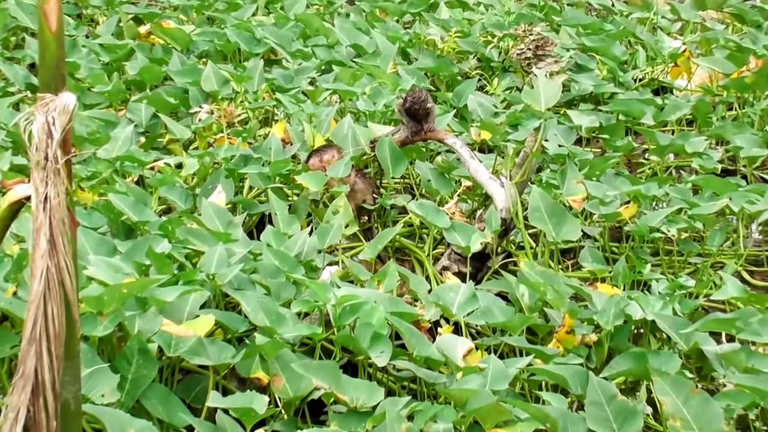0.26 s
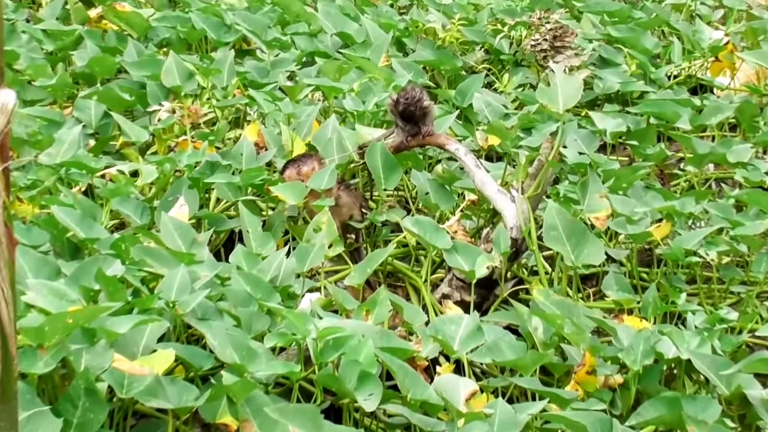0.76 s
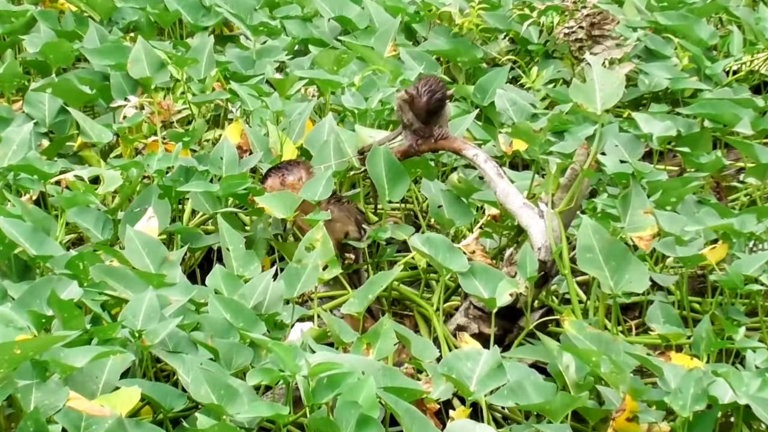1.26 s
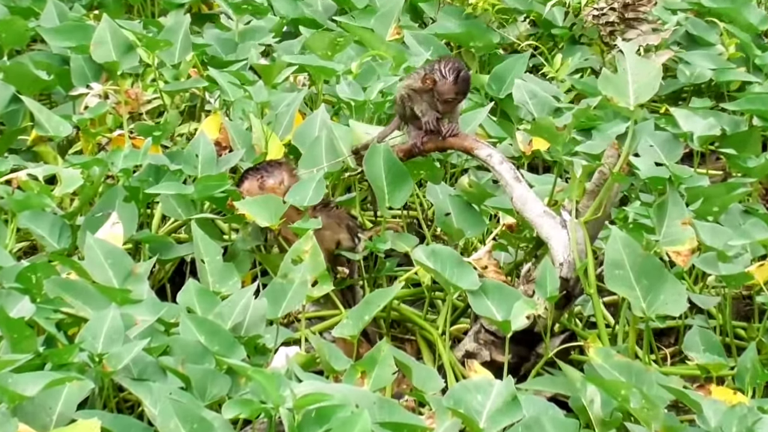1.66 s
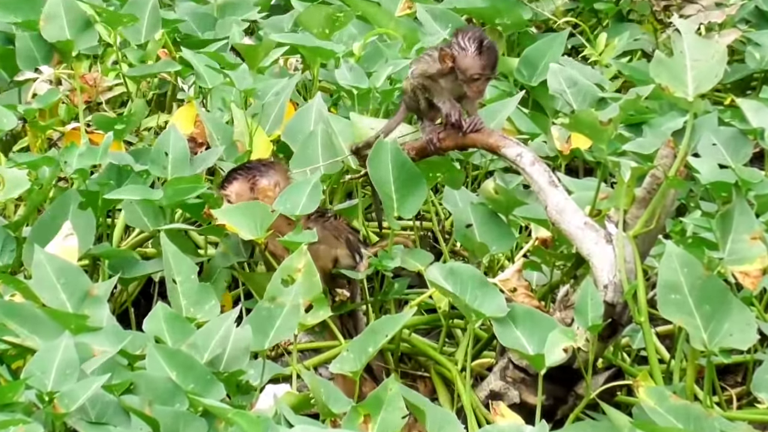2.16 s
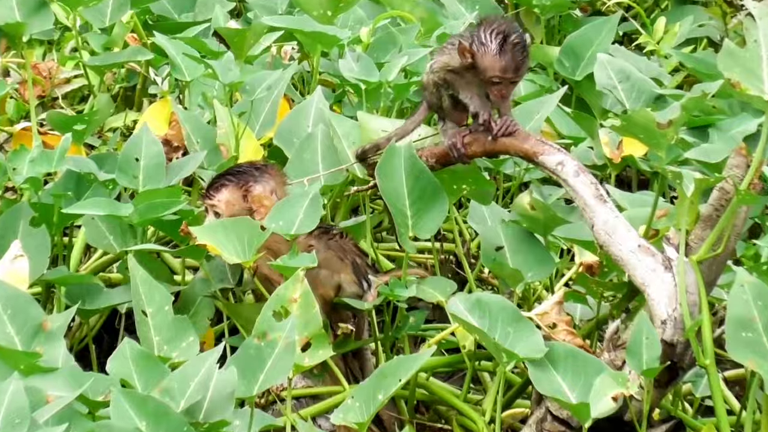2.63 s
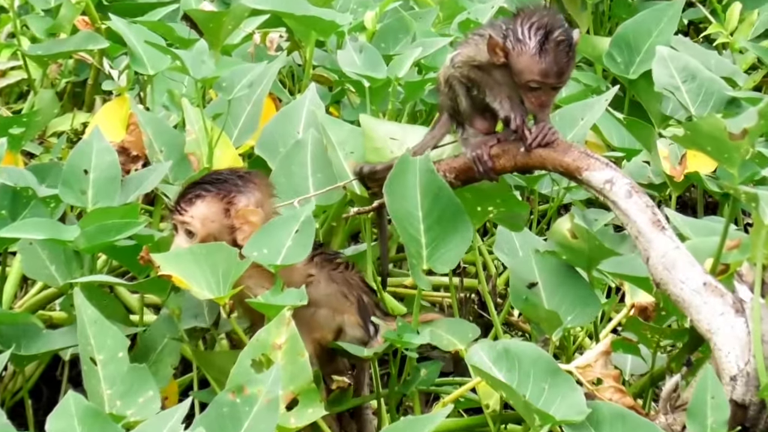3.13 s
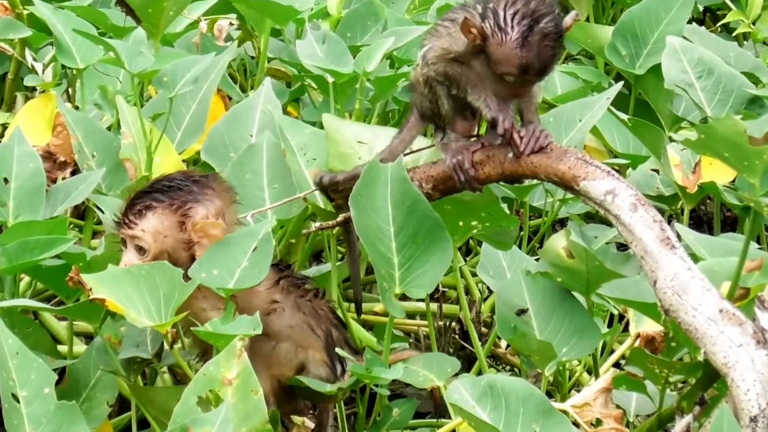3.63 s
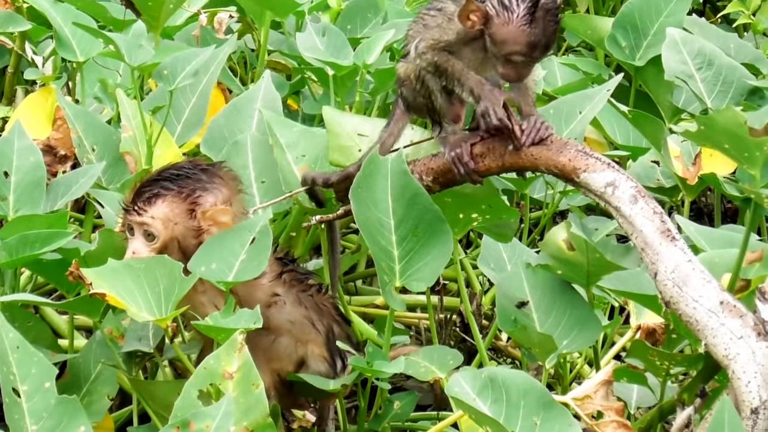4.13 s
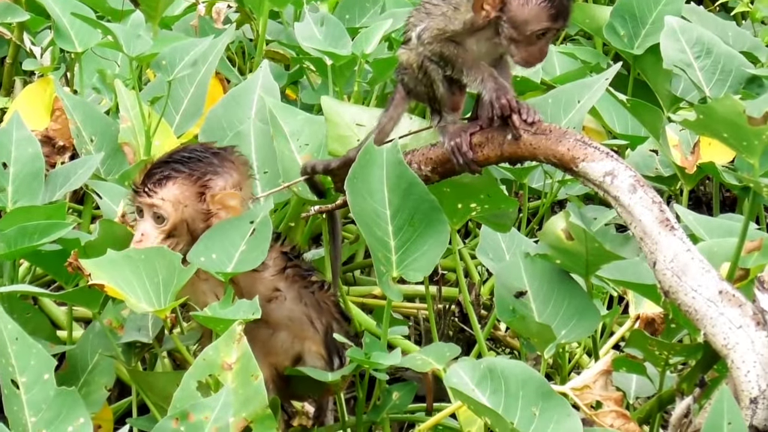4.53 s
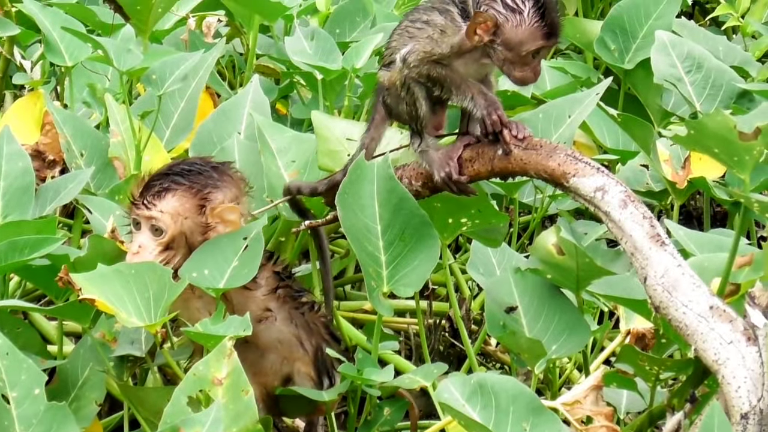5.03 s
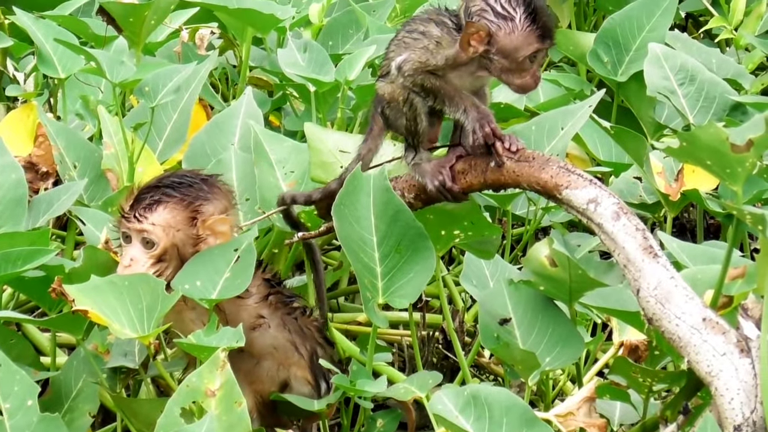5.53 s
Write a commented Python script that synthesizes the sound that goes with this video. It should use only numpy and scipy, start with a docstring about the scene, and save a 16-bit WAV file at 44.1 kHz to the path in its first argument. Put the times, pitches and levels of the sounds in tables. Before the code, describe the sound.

Overlapping monkey coos and hoots in a leafy field, a stalk snap, then two shrill whistling screams that break into harsh rasps.

```python
"""Young monkeys in a field of broad leaves coo to each other, their calls overlapping; then one screams twice.
Calls are harmonics weighted by throat and mouth. Each scream arches up to a whistle and breaks into a rough fall.
Stalks snap as damped rings with noise cracks. Three insects pulse in the treble as narrow resonances, over
a far chorus, a low noise rumble of wind and a faint hush of air."""
import sys
import numpy as np
from scipy import signal
from scipy.fft import rfft, irfft, next_fast_len
from scipy.io import wavfile
from scipy.ndimage import map_coordinates

SR = 44100
rng = np.random.default_rng(int(sys.argv[2]) if len(sys.argv) > 2 else 0)


def transcribe(u):
    """Save the signal u as a 16-bit wav file named by the first command-line argument.

    u: samples, shape (n,) or (channels, n), limited to [-1, 1]; the rate is SR.
    q: integer samples, one column per channel.
    """
    v = np.clip(np.atleast_2d(u).T, -1, 1)
    q = np.round(v * 32767).astype(np.int16)
    wavfile.write(sys.argv[1], SR, q)


N = 254898
TIME = np.arange(N) / SR  # s

# resonances of the throat and wide mouth: [f/Hz, gain/dB]
OPEN_MOUTH = [(500, 36), (900, -5), (1300, 1), (1800, 3), (2200, -20), (2750, -20), (3550, -10),
              (4100, -26), (4600, -31), (5600, -45), (8000, -50), (11000, -49)]
# resonances of the throat and rounded lips: [f/Hz, gain/dB]
PURSED_LIPS = [(550, 9), (900, 2.5), (1250, -3), (1700, -3.5), (2250, -30.5), (2600, -28), (3100, -23),
               (3750, -21.5), (5000, -39.5), (6300, -35), (7700, -41), (10300, -18.5), (12000, -52.5)]
COO_JITTER = 0.004  # random pitch unsteadiness of a clear call, share of the pitch


def amp(db):
    """Decibels to gain."""
    return 10 ** (np.asarray(db) / 20)


def unit(x):
    """Scale to rms 1."""
    return x / np.sqrt(np.mean(x ** 2) + 1e-20)


def along(points, hz):
    """Read (Hz, value) points on a log frequency axis."""
    f, v = np.transpose(points)
    return np.interp(np.log(hz + 1), np.log(f), v)


def curves(rows, t=TIME):
    """Read every column after the first at the points t of the first."""
    s, *cols = np.transpose(rows)
    return [np.interp(t, s, c) for c in cols]


def wobble(rate, t=TIME):
    """A smooth random curve, rate knots a second."""
    at = (t - t[0]) * rate
    return map_coordinates(rng.standard_normal(int(at[-1]) + 4), [at])


def filtered(x, response):
    """Multiply the spectrum of x by a response of frequency."""
    m = next_fast_len(N + SR // 4)
    hz = np.fft.rfftfreq(m, 1 / SR)
    return irfft(rfft(x, m) * response(hz), m)[..., :N]


def panned(x, left_db):
    """Louder on the left by left_db, at the same power."""
    return x * unit(amp([[left_db / 2], [-left_db / 2]]))


def rush(spectrum, alike):
    """Stereo noise of rms 1 with a colour and a left-right likeness, mixed from mid and side."""
    def mid_side(hz):
        turn = np.arccos(np.clip(along(alike, hz), -1, 1)) / 2
        return amp(along(spectrum, hz)) * [np.cos(turn), np.sin(turn)]

    mid, side = filtered(rng.standard_normal((2, N)), mid_side)
    return unit(np.array([mid + side, mid - side]))


def wind():
    """A dull noise rumble with one mild gust and brief dips, and the faint hush of air over the leaves."""
    # brief dips of the rumble: [t/s, depth/dB]
    dips = [(4.38, 5), (4.85, 1.5), (5.27, 8)]
    # colour of the rumble: [f/Hz, relative level/dB]
    rumble_colour = [(12, -53), (20, -62), (34, -13), (64, -2.5), (134, -1), (243, -5.5), (278, -13.5),
                     (313, -18.5), (353, -27), (392, -31), (422, -38.5), (475, -37), (700, -37.5),
                     (910, -56.5), (1540, -120)]
    # colour of the hush: [f/Hz, relative level/dB]
    hush_colour = [(300, 5), (600, 4), (1100, -6.5), (1700, -6.5), (2600, -13.5), (3500, -13),
                   (4400, -17.5), (5600, -21.5), (7000, -17), (11000, -14.5), (15500, -18.5)]
    # left-right likeness of the hush: [f/Hz, likeness/0-1]
    hush_alike = [(600, 0.13), (1400, 0.8), (3100, 1), (5000, 1), (7000, 1), (15000, .05)]
    base_db, gust_peak_db = -33, 1.05
    gust_s, gust_width_s = 1.6, 0.86
    dip_fall_s, dip_return_s = 0.07, 0.41

    gust_db = gust_peak_db * np.exp(-((TIME - gust_s) / gust_width_s) ** 2)
    dip_db = sum(np.interp(TIME, [s - dip_fall_s, s, s + dip_return_s], [0, db, 0]) for s, db in dips)
    rumble_db = base_db + gust_db - dip_db + 0.7 * wobble(15)
    rumble = amp(rumble_db) * rush(rumble_colour, [(100, 0.9), (280, 0.92), (600, 0.13)])
    hush = amp(-57.5 + 0.67 * wobble(2.9)) * rush(hush_colour, hush_alike)
    return panned(rumble, left_db=-3.0) + hush


def song_level(bouts, rest_db):
    """Each bout swells from the resting level, holds and breaks off; in dB."""
    stop_s = 0.05
    levels = [np.interp(TIME, [s, s + swell, end, end + stop_s], [rest_db, db, db, rest_db])
              for s, swell, end, db in bouts]
    return np.max(levels, axis=0)


def insect(song, db, left_db):
    """Even wing strokes with short pauses drive a narrow resonance of the wing, whose phase wanders."""
    hz, width_hz, rate, start, depth, tooth_rate, tooth_depth = song

    def resonance(f, width):
        return np.exp(-((f - hz) / width) ** 2)

    ring = filtered(rng.standard_normal((2, N)), lambda f: resonance(f, width_hz))
    steady = np.cos(np.angle(signal.hilbert(ring)))  # keep the wandering phase, flatten the level
    wing = filtered(steady, lambda f: resonance(f, 2 * width_hz))
    strokes = 1 - depth + depth * np.abs(np.cos(np.pi * rate * (TIME - start)))
    teeth = 1 + tooth_depth * np.cos(2 * np.pi * tooth_rate * TIME)  # the scraper skips over the file
    return panned(amp(db) * unit(wing * strokes * teeth), left_db)


def insects():
    """A katydid that drops away and slowly returns, two crickets, and a far chorus of coloured noise."""
    # songs: [f/Hz, width/Hz, pulse rate/Hz, first pulse/s, depth/0-1, tooth rate/Hz, tooth depth/0-1]
    katydid_song = (9170, 620, 8.13, .103, .88, 165, .45)
    high_song = (7990, 150, 11.65, .054, .7, 0, 0)
    low_song = (4910, 110, 18.25, .021, .92, 0, 0)
    # bouts of song: [t/s, swell/s, end/s, level/dB]
    katydid_bouts = [(-.1, .05, 1.36, -55.5), (4.2, .7, 5.8, -59.5)]
    low_bouts = [(-.1, .05, 0.58, -73.5), (1.3, 0.15, 3.3, -74.5), (3.85, 0.27, 4.72, -76),
                 (5.2, .2, 5.4, -75)]
    chorus_bouts = [(1.8, 1, 5.8, -62.5)]
    # colour of the chorus: [f/Hz, relative level/dB]
    chorus_colour = [(6000, -67), (7400, 9), (8300, 4), (9200, 14.5), (9650, 13.5), (10300, -3.5),
                     (11200, -3.5), (12500, -32)]

    katydid = insect(katydid_song, song_level(katydid_bouts, rest_db=-76.5), left_db=0.5)
    high = insect(high_song, db=-68.5, left_db=0.5)
    low = insect(low_song, song_level(low_bouts, rest_db=-100), left_db=-1)
    chorus_db = song_level(chorus_bouts, rest_db=-66) + wobble(11)
    chorus = amp(chorus_db) * rush(chorus_colour, [(9000, 0.39)])
    return katydid + high + low + chorus


def snaps():
    """Stalks give way, each with a noise crack and a short hollow ring of damped modes."""
    # stalks that break: [t/s, strength/dB]
    breaks = [(0.073, -49), (0.352, -43), (3.651, -30.5)]
    # modes of a hollow stalk: [f/Hz, relative level/dB, t60/s]
    stalk_modes = [(802, 2, 0.04), (1365, -11.5, 0.052), (1840, -1, 0.018), (2560, -6, 0.022),
                   (3280, -5, 0.023), (6350, -16, 0.0045)]
    # colour of the crack: [f/Hz, relative level/dB]
    crack_colour = [(400, -33), (900, -18), (3300, 4), (5000, -2.5), (7300, 2), (10000, -1), (14000, -29)]

    rings, cracks = np.zeros(N + SR), np.zeros(N + SR)
    t = np.arange(SR // 8) / SR
    for s, db in breaks:
        ring = sum(amp(level - 60 * t / t60) * np.sin(2 * np.pi * hz * t + rng.uniform(0, 2 * np.pi))
                   for hz, level, t60 in stalk_modes)
        strength = amp(db) * (1 - np.exp(-t / 0.00036))  # a very short onset
        first = round(s * SR)
        rings[first:][:len(t)] += amp(-3.5) * strength * ring
        cracks[first:][:len(t)] += strength * amp(-60 * t / 0.016) * rng.standard_normal(len(t))
    coloured = filtered(cracks[:N], lambda hz: amp(along(crack_colour, hz)))
    return panned(rings[:N] + coloured, left_db=1.0)


def voice(rows, mouth, bright_db, jitter, rasp=0., count=10):
    """Harmonics of the vocal folds, weighted by the mouth; rough folds scatter in phase and add side tones."""
    on = (TIME >= rows[0][0]) & (TIME <= rows[-1][0])
    t = TIME[on]
    pitch, db, *rough = curves(rows, t)
    chaos = rasp * rough[0] if rough else 0
    pitch = pitch * (1 + jitter * wobble(170.9, t))
    phase = 2 * np.pi * np.cumsum(pitch) / SR + chaos * wobble(1100, t)

    k = np.arange(1, count + 1)[:, None]  # harmonic numbers
    weight_db = along(mouth, k * pitch) - along(mouth, pitch) + bright_db * np.log2(k)
    weights = amp(weight_db) * (k * pitch < SR / 2)
    shimmer = amp(1.2 * np.sqrt(k - 0.8) * np.array([wobble(35, t) for _ in k]))
    harmonics = (weights * shimmer * np.sin(k * phase)).sum(0)
    # strained folds repeat only every fourth cycle, which adds a tone a quarter below the pitch
    side_tone = 0.7 * chaos * np.sin(phase * 3 / 4)

    flutter = amp(0.27 * wobble(64.5, t) + 7.5 * chaos * wobble(760, t))
    edges = np.clip(np.minimum(t - t[0], t[-1] - t) / 0.0039, 0, 1)
    out = np.zeros(N)
    out[on] = np.sqrt(2) * amp(db) * edges * flutter * (harmonics + side_tone)
    return out


def chirps():
    """Brief hoots through pursed lips that swell and slide to their final pitch."""
    # chirps: [t/s, length/s, start f/Hz, end f/Hz, reference level/dB, brightness/dB per octave]
    chirp_rows = [(0.232, .12, 1405, 1750, -71, -9), (.56, 0.1, 1320, 1580, -69.5, 0),
                  (1.162, 0.036, 1210, 1327, -41, -1), (1.262, .073, 556, 550, -55.5, -19),
                  (1.311, 0.034, 783, 1115, -48, 4.5), (2.88, 0.062, 1155, 1198, -42, -4.5),
                  (2.988, 0.058, 1257, 1306, -37.5, -6.5), (3.014, 0.039, 854, 1030, -53.5, 8.5),
                  (4.063, 0.027, 1400, 1630, -55, -4), (4.202, .066, 1550, 3070, -55.5, -16),
                  (4.218, 0.01, 4420, 4830, -46, -20), (4.78, .099, 1426, 1830, -69, -10),
                  (4.941, 0.051, 996, 1082, -46, -1), (5.602, 0.13, 1367, 1840, -71, -12)]
    out = np.zeros(N)
    for s, length, start_hz, end_hz, db, bright_db in chirp_rows:
        middle_hz = start_hz + 0.75 * (end_hz - start_hz)
        rows = [(s, start_hz, db - 3),
                (s + length / 2, middle_hz, db + 2.5),
                (s + length, end_hz, db - 14)]
        out += voice(rows, PURSED_LIPS, bright_db, jitter=0.021, count=4)
    return panned(out, left_db=4.0)


def arch(t, rise, fall, first, top, last, flatness):
    """Climb from first to a rounded top, then sink to last."""
    climb = (first - top) * np.abs(1 - t / rise) ** flatness
    sink = (last - top) * np.abs((t - rise) / fall) ** flatness
    return top + np.where(t < rise, climb, sink)


def coos():
    """Clear coos whose pitch and loudness rise and sink together."""
    # arched coos: [t/s, rise/s, fall/s, start f/Hz, top f/Hz, end f/Hz, flatness of the top,
    # top level/dB, brightness/dB per octave, left against right/dB, mouth]
    coo_rows = [(1.83, 0.2, 0.24, 783, 885, 728, 2.9, -45, -3.5, 8.5, OPEN_MOUTH),
                (2.43, .15, 0.21, 674, 922.7, 678, 3.2, -45, 1, 8, OPEN_MOUTH),
                (3.23, .16, .17, 460.4, 595, 444, 1.3, -48, -5.5, -0.5, PURSED_LIPS)]
    swell_db, fade_db, level_bend = 11, 19, 3.3  # start and end lie this far below the top

    out = np.zeros((2, N))
    for s, rise, fall, start_hz, top_hz, end_hz, flatness, db, bright_db, left_db, mouth in coo_rows:
        t = TIME[TIME < rise + fall]
        pitch = arch(t, rise, fall, start_hz, top_hz, end_hz, flatness)
        level = arch(t, rise, fall, db - swell_db, db, db - fade_db, level_bend)
        rows = np.column_stack([s + t, pitch, level])
        out += panned(voice(rows, mouth, bright_db, COO_JITTER, count=7), left_db)
    return out


def long_calls():
    """A nearly pure long hoot through pursed lips, and a wavering wail."""
    # each call, before its gain below: [t/s, f/Hz, level of the fundamental/dB]
    hoot_rows = [(2.125, 1072, -54), (2.159, 1116, -42.5), (2.229, 1175, -40.5), (2.303, 1130, -45.5),
                 (2.351, 1234, -35.5), (2.593, 1323, -35.5), (2.661, 1303, -41.5), (2.68, 1226, -54)]
    wail_rows = [(3.04, 1065, -52.5), (3.084, 1077, -58), (3.102, 1207, -41), (3.124, 1327, -37.5),
                 (3.166, 1159, -42.5), (3.2, 1159, -41.5), (3.236, 1080, -52), (3.3, 1061, -47.5),
                 (3.39, 907, -57), (3.41, 820, -77)]
    # resonances of the wailing mouth: [f/Hz, gain/dB]
    wail_mouth = [(850, -5), (1250, 2.5), (1800, 3.5), (2300, -15), (2750, -23.5), (3250, -7), (3550, -2.5),
                  (3950, -13), (4600, -29), (6000, -35)]

    hoot = voice(hoot_rows, PURSED_LIPS, bright_db=-4.0, jitter=COO_JITTER)
    wail = voice(wail_rows, wail_mouth, bright_db=0.0, jitter=0.0094, count=5)
    return amp(0.85) * panned(hoot, left_db=1.0) + amp(2.0) * panned(wail, left_db=8.0)


def shriek(rows, bright_db, rasp, hiss_db, fuzz_db):
    """A strained voice; roughness adds throat hiss and a band of noise around the pitch."""
    # resonances of the mouth with bared teeth: [f/Hz, gain/dB]
    bared_teeth = [(1000, -14), (2300, -8), (3700, 6.5), (5500, -4.5), (7400, 3), (9000, -14),
                   (10500, -1.5), (12000, -42), (15500, -27)]
    # colour of the throat hiss: [f/Hz, relative level/dB]
    hiss_colour = [(900, -25.5), (2000, -51), (3800, -6), (5500, -1), (7500, 9.5), (9500, 3.5),
                   (11500, -3.5), (15500, -13)]

    pitch, db, rough = curves(rows)
    on = (TIME >= rows[0][0]) & (TIME <= rows[-1][0])
    hiss = unit(filtered(rng.standard_normal(N), lambda hz: amp(along(hiss_colour, hz))))
    carrier = np.exp(2j * np.pi * np.cumsum(pitch) / SR)
    fuzz = np.real((wobble(1500) + 1j * wobble(1500)) * carrier)
    noise = on * amp(db) * (rough * amp(hiss_db) * hiss + rough ** 2 * amp(fuzz_db) * fuzz)
    clear = np.sqrt(1 - np.clip(rough, 0, 0.95) ** 2)
    return clear * voice(rows, bared_teeth, bright_db, jitter=0.0087, rasp=rasp, count=4) + noise


def whistles():
    """A scream arches up to a trembling whistle; its pitch sets how rough it is and shapes its loudness."""
    # a strong arch and a weak one below it in each scream, levels before the register gain:
    # [t/s, rise/s, fall/s, start f/Hz, top f/Hz, end f/Hz, start level/dB, end level/dB]
    arches = [(4.273, .081, .032, 3950, 9150, 7440, -26.5, -20),
              (4.325, 0.023, 0.011, 6100, 6900, 6100, -30.5, -36),
              (5.209, .078, 0.068, 5250, 9900, 7400, -21, -30),
              (5.202, 0.0244, .008, 3650, 4400, 4350, -23, -40)]
    # flares on the mouth's resonances, rough where the register changes: [f/Hz, gain/dB, roughness/0-1]
    register = [(3500, -12.5, .15), (4100, -13, .12), (4700, -5, .1), (5700, -2.5, .2), (6550, -7, 0.8),
                (7400, 3.5, 0.3), (8250, -2.5, 0.3), (9000, 0, .12), (9900, -4.5, 0.1)]
    rise_ease, sink_bend = 1.75, 2.1  # starts upward gently, rounds off at the top, sinks ever faster

    out = np.zeros(N)
    for s, rise, fall, start_hz, top_hz, end_hz, start_db, end_db in arches:
        t = TIME[TIME < rise + fall]
        climb = start_hz + (top_hz - start_hz) * np.abs(np.sin(np.pi / 2 * t / rise)) ** rise_ease
        sink = top_hz + (end_hz - top_hz) * np.abs((t - rise) / fall) ** sink_bend
        pitch = np.where(t < rise, climb, sink)
        gain_db, rough = curves(register, pitch)
        level = np.linspace(start_db, end_db, len(t)) + gain_db + 2 * wobble(130, t)
        rows = np.column_stack([s + t, pitch, level, rough])
        out += shriek(rows, bright_db=-30, rasp=0.3, hiss_db=-7.5, fuzz_db=-2)
    return out


def falls():
    """The voice breaks to a lower register and slides down in harsh spurts, most growing rougher."""
    # spurts; in the second scream the folds split into two pitches: [t/s, attack/s, hold/s, release/s,
    # start f/Hz, end f/Hz, level/dB, start roughness/0-1, end roughness/0-1, hiss/dB]
    spurts = [(4.385, 0.02, 0.0052, 0.0046, 5270, 3650, -24, .02, .08, -0.5),
              (4.414, 0.0063, .011, .012, 3750, 3184, -23.5, 0.28, 0.37, 5),
              (4.43, 0.0056, .014, .028, 2847, 2045, -34.5, .2, 0.33, 8),
              (4.468, 0.0073, 0.021, 0.018, 1500, 980, -54, .3, 0.4, -6),
              (5.36, 0.0071, 0.0097, 0.022, 4190, 3880, -25, .35, .7, -8),
              (5.393, .016, .008, .016, 4000, 3700, -31, 0.37, .55, -5),
              (5.363, 0.00386, .034, .008, 3450, 2200, -37.5, 0.3, 0.35, -9),
              (5.403, 0.0105, .025, 0.0152, 1650, 1104, -57, 0.54, .3, -8)]
    attack_db, sag_db_per_s, release_db = 25, 126.5, 25  # depth of attack, sag while held, depth of release
    full_voice_db, soft_dulling = -28, 0.17  # dB per octave lost for each dB below full voice

    out = np.zeros(N)
    for s, attack, hold, release, start_hz, end_hz, db, start_rough, end_rough, hiss_db in spurts:
        t = TIME[TIME < attack + hold + release]
        held_db = db - sag_db_per_s * hold
        corners = np.cumsum([0, attack, hold, release])
        level = np.interp(t, corners, [db - attack_db, db, held_db, held_db - release_db])
        pitch = np.geomspace(start_hz, end_hz, len(t))
        rough = np.linspace(start_rough, end_rough, len(t))
        rows = np.column_stack([s + t, pitch, level + wobble(110, t), rough])
        bright_db = -2.0 - soft_dulling * (full_voice_db - db)
        out += shriek(rows, bright_db, rasp=0.3, hiss_db=hiss_db, fuzz_db=9.5)
    return out


def two_ports(x):
    """The right port hears the treble later than the left, and shaded."""
    # right port behind left: [f/Hz, lag/rad]
    port_lag = [(1500, .15), (7000, 0), (8300, 0), (9040, 2.6), (10000, 3.8), (15000, 5)]
    # right port against left: [f/Hz, gain/dB]
    port_shade = [(1500, -1), (4000, -.5), (5500, 3), (7500, -3), (9000, -4), (10000, 2), (12000, 8)]

    def ports(hz):
        right = amp(along(port_shade, hz)) * np.exp(-1j * along(port_lag, hz))
        return np.array([np.ones(len(hz)), right])

    return filtered(x, ports)


def reflections(x):
    """Ground and leaves send back a few delayed copies."""
    # echoes: [delay/s, level/dB]
    echoes = [(0.01, -11.5), (0.022, -22), (.037, -21.5)]
    return filtered(x, lambda hz: sum(amp(db) * np.exp(-2j * np.pi * hz * delay) for delay, db in echoes))


def field(x, wet_db, delay):
    """Leaves and far trees scatter a short diffuse tail: decaying noise that builds up over delay seconds."""
    # decay of the tail: [f/Hz, t60/s]
    field_t60 = [(500, 0.72), (1500, 0.42), (2600, 0.39), (3500, 0.45), (4500, 0.35), (6000, 0.35),
                 (8500, 0.28), (14000, 0.11)]
    hz, t, z = signal.stft(rng.standard_normal((2, SR // 2)), SR, nperseg=256)
    late = amp(-60 * t / along(field_t60, hz)[:, None])
    early = 5.2 * amp(-60 * t / 0.061)
    tail = signal.istft(z * (late + early) * (1 - np.exp(-t / delay)), SR, nperseg=256)[1]
    tail = tail / np.linalg.norm(tail[0])
    return amp(wet_db) * signal.fftconvolve(x.mean(0)[None], tail, axes=1)[:, :N]


def scene():
    """The calls reach the two ports out of step in the treble, over insects and wind."""
    soft = coos() + long_calls() + chirps() + snaps()
    loud = panned(whistles() + falls(), left_db=5.2)
    direct = two_ports(soft + loud)
    tails = field(soft, wet_db=-12.5, delay=0.0027) + field(loud, wet_db=-10.0, delay=0.0078)
    return direct + reflections(loud) + tails + insects() + wind()


def record(dry):
    """Cut everything above the band limit."""
    top_hz = 15550
    return filtered(dry, lambda hz: hz < top_hz)


dry = scene()
out = record(dry)
transcribe(out)
```